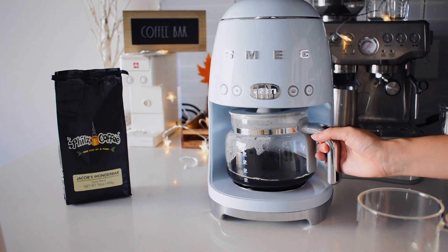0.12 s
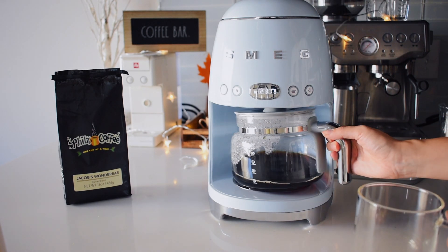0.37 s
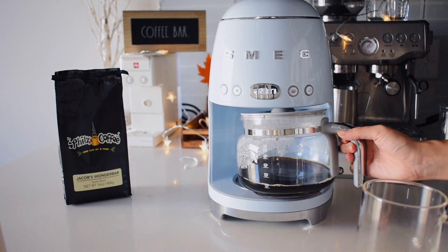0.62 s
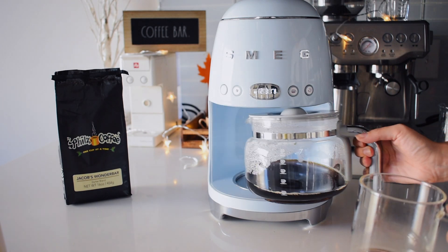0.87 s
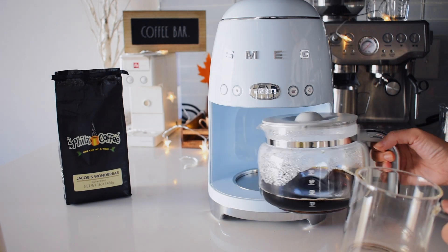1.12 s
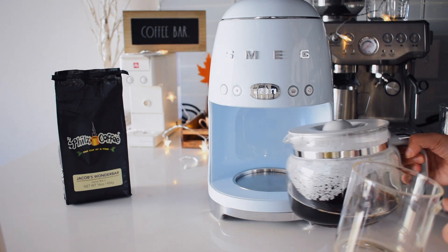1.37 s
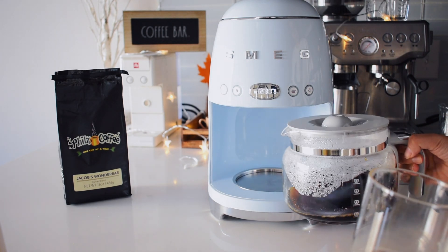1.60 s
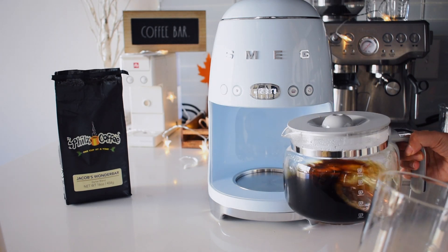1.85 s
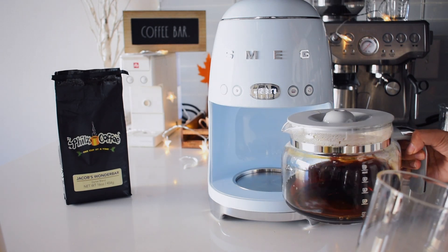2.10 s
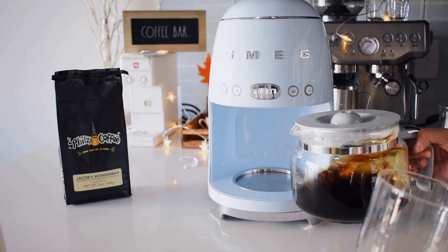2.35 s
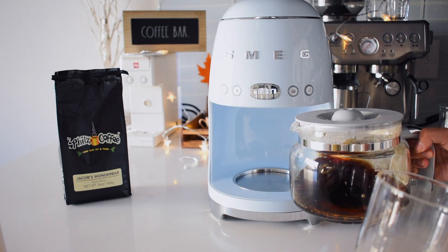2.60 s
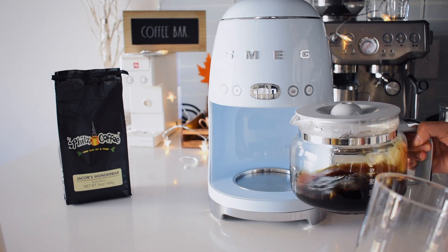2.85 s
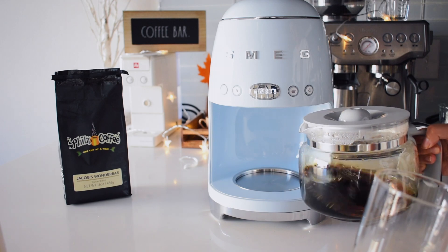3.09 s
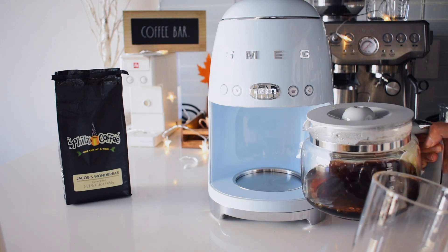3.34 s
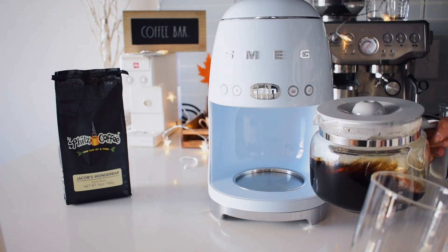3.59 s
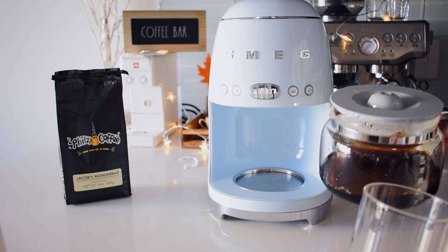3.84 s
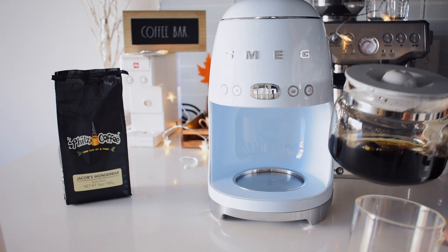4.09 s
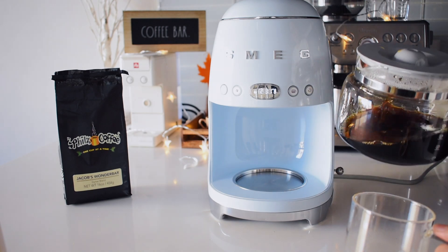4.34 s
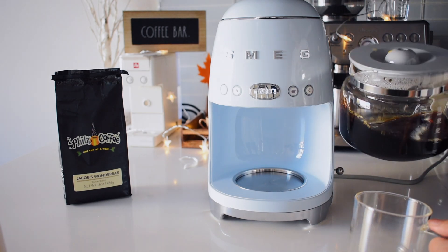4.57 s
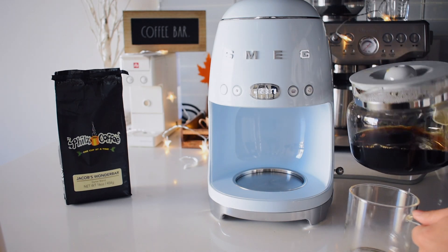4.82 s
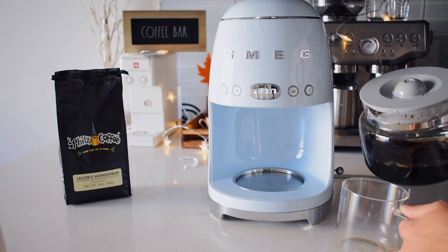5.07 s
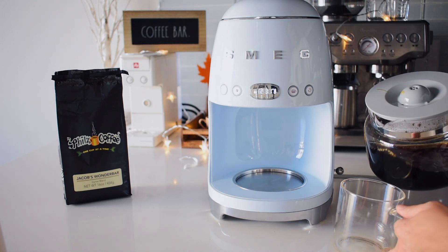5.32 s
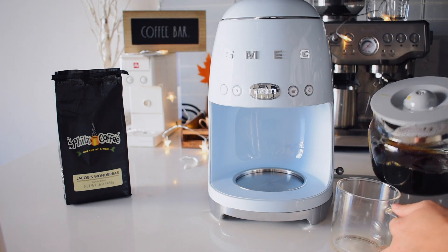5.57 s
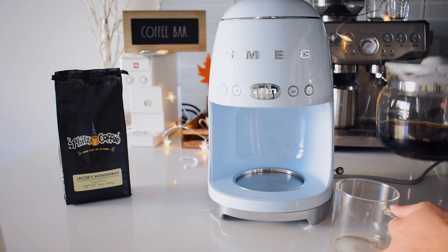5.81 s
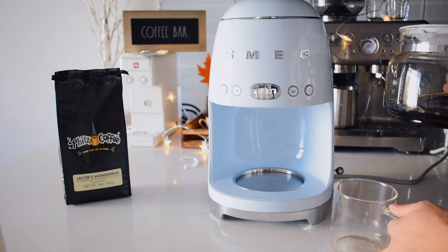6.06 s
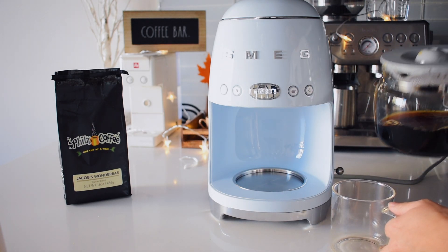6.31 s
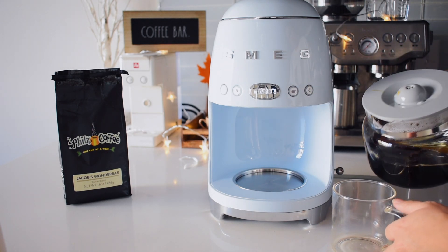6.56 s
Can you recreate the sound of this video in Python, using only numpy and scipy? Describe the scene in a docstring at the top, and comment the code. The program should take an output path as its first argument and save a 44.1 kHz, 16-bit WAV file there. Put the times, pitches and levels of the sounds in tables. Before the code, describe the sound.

Short gritty slide and clatter of a glass pot, faint lid ticks, a long near-silence, then bright glass clinks and a mug knock.

```python
"""A glass carafe slides out of a coffee maker and is swirled, its plastic lid and handle ticking;
its rim clinks a glass mug, which knocks and shuffles on a stone counter.
Glass and plate are struck banks of decaying modes, ticks and knocks are filtered crackles, rubbing is
filtered grains; filtered noise makes the hum of the quiet hard kitchen, which answers with a flutter
echo and a short tail."""
import sys
import numpy as np
from scipy import signal
from scipy.fft import rfft, irfft, next_fast_len
from scipy.io import wavfile
from scipy.ndimage import uniform_filter1d, map_coordinates

SR = 44100
rng = np.random.default_rng(int(sys.argv[2]) if len(sys.argv) > 2 else 0)


def inscribe(sig):
    """Save sig as 16-bit PCM at rate SR to the path in sys.argv[1].

    A 1-D sig is mono; a 2-D sig holds one channel per row.
    Samples are clipped to [-1, 1] before scaling.
    """
    pcm = np.round(np.clip(np.atleast_2d(sig).T, -1, 1) * 32767)
    wavfile.write(sys.argv[1], SR, pcm.astype(np.int16))


def gain_from_db(level_db):
    """Turn a decibel level (scalar or array-like) into a linear amplitude factor."""
    decades = np.asarray(level_db, float) / 20
    return 10 ** decades


N = 294588  # length in samples


def unit(x):
    """Scale to rms 1."""
    return x / np.sqrt(np.mean(x ** 2) + 1e-20)


def along(points, hz):
    """Read a curve of (Hz, value) points on a log frequency axis."""
    f, v = np.transpose(points)
    return np.interp(np.log(hz + 1), np.log(f + 1), v)


def gains(rows):
    """One gain per sample for each dB column, silent outside the table."""
    s, *columns = np.transpose(rows)
    t = np.arange(N) / SR
    return [gain_from_db(np.interp(t, s, db, left=-120, right=-120)) for db in columns]


def stroke(s, db, rise, fall):
    """A gain that swells to db at s and fades, straight in dB; rise and fall are seconds per 20 dB."""
    t = np.arange(N) / SR - s
    return gain_from_db(db - 20 * np.maximum(-t / rise, t / fall))


def filtered(x, response):
    """Shape the spectrum of x by a complex response of frequency."""
    m = next_fast_len(len(x) + 8192)
    spectrum = rfft(x, m) * response(np.fft.rfftfreq(m, 1 / SR))
    return irfft(spectrum, m)[:len(x)]


def bell(hz, centre_hz, octaves):
    """A bell-shaped weight on a log frequency axis."""
    distance = np.log2((hz + 1) / centre_hz) / octaves
    return np.exp(-.5 * distance ** 2)


def resonances(peaks):
    """Causal response of (Hz, width Hz, dB) resonances, summed with alternating signs."""
    def response(f):
        total = 0
        for k, (centre, width, db) in enumerate(peaks):
            damping = 1j * f * width
            total = total + (-1) ** k * gain_from_db(db) * damping / (centre * centre - f * f + damping)
        return total
    return response


def grit(rate, spread_db):
    """Sparse grains of uneven size, on average rate a second."""
    hits = rng.random(N) < rate / SR
    return hits * rng.standard_normal(N) * gain_from_db(spread_db * rng.standard_normal(N))


def add(mix, s, sound, near_db=0):
    """Put a sound and its room answer into the mix at s seconds."""
    part = mix[round(s * SR):]
    wet = kitchen(sound, near_db)[:len(part)]
    part[:len(wet)] += wet


def struck(blows, pitches, modes, rise, blur_hz=0, near_db=0):
    """Each blow wakes the modes near its own pitch most; loose contact blurs their pitch."""
    mix, t = np.zeros(N), np.arange(SR // 2) / SR
    hz = np.array(pitches)[:, None]
    level, t60 = np.transpose(modes)[:, :, None]
    for s, db, centre_hz, octaves in blows:
        luck = rng.standard_normal((2, len(modes), 1))  # uneven level and random sign per mode
        size = gain_from_db(db + level + luck[0]) * np.sign(luck[1]) * bell(hz, centre_hz, octaves)
        # a random walk of phase in steps of 50 samples, smoothed
        walk = rng.standard_normal((len(modes), len(t) // 50)).cumsum(1).repeat(50, 1)
        wander = np.sqrt(2 * np.pi * blur_hz / SR) * walk * 50 ** .5
        phase = 2 * np.pi * hz * t + uniform_filter1d(wander, size=50)
        ring = size * gain_from_db(-60 * t / t60) * np.sin(phase)
        add(mix, s, ring.sum(0) * (1 - np.exp(-t / rise)), near_db)
    return mix


def bursts(rows, rise):
    """Contacts without a clear ring, rows of (s, dB, Hz, octaves, decay s): a dying crackle round one pitch."""
    mix, t, lead = np.zeros(N), np.arange(SR // 8) / SR, SR // 100
    for s, db, hz, octaves, decay_s in rows:
        shape = (1 - np.exp(-t / rise)) * gain_from_db(-60 * (t / decay_s) ** 1.5)
        z = rfft(shape * rng.standard_normal(len(t)))
        crackle = np.sqrt(shape) * irfft(z / np.abs(z), len(t))  # flattened: no chance peaks to ring on
        # the lead leaves room for the filter's spread ahead of the contact
        puff = filtered(np.pad(crackle, (lead, 0)), lambda f: bell(f, hz, octaves))
        add(mix, s - lead / SR, gain_from_db(db) * puff * np.linalg.norm(shape) / np.linalg.norm(puff))
    return mix


def carafe():
    """The glass body rings on through its modes; the banded rim clinks, mostly with quick decays."""
    # blows on the body: start_s, level_db (ahead of mode levels), push_centre_hz, push_width_octaves
    body_blows = [(1.59, -45.5, 3280, .68), (1.99, -48, 2560, 0.17), (2.06, -44, 1900, 0.56),
                  (2.099, -34.5, 1760, .26), (2.303, -48, 8400, .15), (2.311, -39, 4500, 0.11),
                  (2.335, -36.5, 1650, .12), (2.489, -50.5, 2600, .11), (2.51, -46.5, 2580, .1),
                  (2.868, -48.5, 2840, 0.29), (3.416, -50.5, 3100, 0.68), (3.847, -41, 3800, 0.8),
                  (4.841, -45, 3200, .68)]
    # body mode pitches: pitch_hz
    body_hz = [1655, 2112, 2580, 2832, 3505, 3700, 4400, 4565, 4829, 8430]
    # body mode strengths: level_db, t60_s
    body_modes = [(-5.5, 0.15), (-4, 0.082), (-3.5, 0.1), (-9, 0.098), (-1, 0.09), (-6.5, 0.1), (-16, 0.12),
                  (-8, 0.13), (-13, 0.25), (-5, 0.25)]
    # blows on the rim: start_s, level_db (ahead of mode levels), push_centre_hz, push_width_octaves
    rim_blows = [(5.531, -23, 5500, 2.7), (5.606, -31.5, 5500, 1.7)]
    # rim mode pitches: pitch_hz
    rim_hz = [3400, 3607, 3989, 4323, 4468, 4840, 5115, 5254, 5631, 5771, 6406, 7155, 7241, 7311, 8059,
              8775, 9076, 10110, 13150, 13650]
    # rim mode strengths: level_db, t60_s
    rim_modes = [(-0.5, 0.038), (6.5, 0.045), (5.5, 0.022), (2.5, 0.042), (4, 0.02), (0, 0.06), (1, 0.055),
                 (-19, .08), (0, 0.045), (-25, 0.65), (-22, .1), (11, 0.03), (-19, 0.038), (-29, .2),
                 (-6, 0.037), (-10.5, 0.21), (0.5, 0.046), (-8, 0.072), (-18, .06), (-20, .08)]
    body = struck(body_blows, body_hz, body_modes, rise=.001, blur_hz=14)
    return body + struck(rim_blows, rim_hz, rim_modes, rise=.001, blur_hz=4)


def slide():
    """The carafe base drags over the hot plate: slips shake plate and glass base, finer grit hisses."""
    # drag levels over time: time_s, grind_db, hiss_db
    drag_levels = [(0.0, -58, -59), (0.05, -53, -63), (0.085, -46.5, -63), (0.124, -62.5, -64),
                   (0.2, -60, -72), (0.216, -44.5, -63), (0.26, -43.5, -68), (0.378, -41, -66),
                   (0.415, -36.5, -59)]
    # resonances of plate and housing: centre_hz, width_hz, level_db
    plate_peaks = [(188, 110, 5.5), (294, 105, 12), (481, 57, 10), (610, 120, 10.5), (1190, 81, -18)]
    grind, hiss = gains(drag_levels)
    plate = unit(filtered(grit(350, spread_db=1.5), resonances(plate_peaks)))
    base = unit(filtered(grit(250, spread_db=4), lambda f: bell(f, 1600, .45)))
    fine = unit(filtered(grit(3800, spread_db=4.5), lambda f: bell(f, 6400, 0.61)))
    base_db = -8  # glass base against the plate
    return kitchen(grind * (plate + gain_from_db(base_db) * base) + hiss * fine)[:N]


def hot_plate():
    """Blows on the steel plate wake its modes, strongly blurred in pitch."""
    # blows: start_s, level_db (ahead of mode levels), push_centre_hz, push_width_octaves
    plate_blows = [(.076, -32.5, 2530, 0.16), (.215, -30.5, 1780, 0.38), (.418, -29, 3550, 4),
                   (.438, -23.5, 1490, 0.95), (.565, -30, 4530, 0.87), (.854, -45, 3000, 0.69),
                   (.951, -50, 3000, 1.6), (1.024, -32.5, 2980, 1.2)]
    # mode pitches: pitch_hz
    steel_hz = [590, 1045, 1250, 1590, 1776, 2500, 3950, 4650, 5000, 6250, 8100]
    # mode strengths: level_db, t60_s
    steel_modes = [(9, 0.079), (-6.5, 0.15), (0.5, 0.053), (-6, 0.16), (-5.5, 0.14), (-6.5, 0.026),
                   (-9, 0.13), (-9.5, 0.086), (-7, 0.11), (-6, 0.1), (-31, 0.066)]
    return struck(plate_blows, steel_hz, steel_modes, rise=.001, blur_hz=110)


def ticks():
    """Short crackles: clear ticks, and a faint rattle of the loose lid at chance moments of the swirl."""
    # ticks of lid, handle and drip valve, and the crack of each clink:
    # start_s, level_db, centre_hz, width_octaves
    tick_rows = [(0.1644, -52, 8800, .3), (0.177, -52, 7100, .25), (0.213, -52, 7050, .4),
                 (0.2578, -52, 7140, .36), (0.343, -33, 5600, .5), (0.4171, -25, 5150, 0.56),
                 (0.425, -39, 4850, 0.35), (0.4373, -25, 6000, 1), (0.5657, -29.5, 5000, 0.58),
                 (0.853, -44.5, 6620, 0.3), (0.949, -44.5, 6000, .52), (0.9894, -52, 4500, 0.61),
                 (1.0245, -27.5, 7100, 0.39), (1.046, -37, 6740, 0.31), (1.071, -41, 3700, 0.62),
                 (1.591, -32.5, 4280, 0.74), (1.8118, -56, 8690, .34), (2.0376, -46.5, 3540, 0.76),
                 (2.272, -49, 5700, .49), (2.3028, -43, 8300, 0.35), (2.3112, -36.5, 5000, 0.28),
                 (2.4897, -53, 3500, .45), (2.509, -55, 6150, 0.55), (2.5925, -50, 7660, 0.67),
                 (2.692, -56, 5240, .37), (2.703, -44, 5070, .24), (2.8672, -43, 3750, .6),
                 (3.165, -52, 6810, 1), (3.1953, -46, 6000, 0.18), (3.4154, -44.5, 7150, .98),
                 (3.8467, -38.5, 3860, .95), (3.8556, -35.5, 6800, 0.49), (4.8413, -43, 3800, 0.53),
                 (5.5299, -21, 7000, 0.62), (5.607, -29.5, 5230, .92), (5.6964, -38, 4020, 0.31),
                 (5.696, -34, 7800, 0.17), (6.218, -55, 5000, .4), (6.305, -34, 3300, .38),
                 (6.306, -42, 7700, 0.089)]
    first_s, last_s, count = 1.9, 3.2, 8
    rattle = []
    for when, size, pitch in rng.random((count, 3)):
        s = first_s + (last_s - first_s) * when
        rattle.append((s, -54 + 6 * (size - .5), 5500 * 2 ** (pitch - .5), .45))
    decay_s = 0.019
    return bursts([(*row, decay_s) for row in tick_rows + rattle], rise=0.00091)


def knocks():
    """Dull crackles: rumbling bumps of the drag and knocks, with slower low booms under some of them."""
    # rumbling bumps of the dragged carafe, then knocks on the machine's housing and the counter:
    # start_s, level_db, centre_hz, decay_s
    knock_rows = [(0.212, -43, 1630, 0.052), (0.258, -35, 297, 0.025), (0.298, -40, 795, 0.01),
                  (0.319, -37.5, 356, 0.04), (0.3419, -40.5, 2120, 0.025), (0.364, -35, 507, 0.011),
                  (0.417, -43, 540, 0.052), (0.437, -34, 577, .054), (0.439, -30.5, 1830, 0.027),
                  (0.564, -37, 690, 0.043), (0.822, -43, 347, 0.023), (0.853, -46.5, 1240, 0.036),
                  (0.95, -48, 1170, 0.032), (1.0237, -35.5, 2820, 0.042), (1.025, -33, 720, 0.079),
                  (1.046, -38, 623, 0.031), (5.531, -27.5, 750, 0.028), (5.605, -35, 790, 0.021),
                  (5.6945, -13, 2460, 0.0076), (6.294, -45, 910, .018), (6.308, -34.5, 950, 0.091)]
    # booms of the machine's hollow body and the counter: start_s, level_db, centre_hz
    boom_rows = [(0.073, -55, 298), (0.212, -43, 203), (0.436, -34, 305), (1.024, -38, 205),
                 (5.696, -41, 237)]
    knock_octaves = 0.6
    boom_octaves, boom_decay_s = 0.61, 0.13
    dull = [(s, db, hz, knock_octaves, decay_s) for s, db, hz, decay_s in knock_rows]
    low = [(*row, boom_octaves, boom_decay_s) for row in boom_rows]
    return bursts(dull, rise=0.00042) + bursts(low, rise=0.014)


def mug():
    """The glass wall rings bright and long; the foot answers lower, shorter and more blurred."""
    # blows on the wall: start_s, level_db (ahead of mode levels), push_centre_hz, push_width_octaves
    wall_blows = [(5.531, -15.5, 1900, 0.48), (5.606, -33, 2580, 0.38), (5.695, -19, 2480, 12),
                  (6.307, -32.5, 2550, .55), (6.309, -30, 10000, 0.34)]
    # wall mode pitches: pitch_hz
    wall_hz = [1152, 2627, 2659, 2700, 4640, 7499, 8877, 10750, 12610]
    # wall mode strengths: level_db, t60_s
    wall_modes = [(1, .31), (-11, .3), (-11, .36), (-14, .12), (-12, .44), (-21, .15), (-29, .2),
                  (-30, .22), (-28, .18)]
    # blows on the foot: start_s, level_db (ahead of mode levels), push_centre_hz, push_width_octaves
    foot_blows = [(5.531, -22.5, 694, 1), (5.606, -35, 800, 1.1), (5.695, -14, 1100, 1.74),
                  (6.307, -22, 910, 0.76)]
    # foot mode pitches: pitch_hz
    foot_hz = [690, 775, 820, 860, 910, 965, 1350, 1500, 1750, 1930, 2230, 2320, 3450, 3830]
    # foot mode strengths: level_db, t60_s
    foot_modes = [(-7.5, 0.043), (5, 0.027), (2.5, 0.022), (-10, 0.11), (-12, 0.14), (-41, 0.14),
                  (0.5, 0.023), (-11, 0.063), (11.5, 0.01), (-2, 0.017), (3.5, 0.022), (0, 0.029),
                  (-14, 0.017), (-3.5, 0.042)]
    wall = struck(wall_blows, wall_hz, wall_modes, rise=.0006, blur_hz=2, near_db=4)
    return wall + struck(foot_blows, foot_hz, foot_modes, rise=.0015, blur_hz=15)


def shuffle():
    """The mug rubs on the counter: grains wake its foot and, a little later, one high wall mode."""
    # one row a stroke: peak_s, rub_db, singing_db
    rub_strokes = [(6.145, -52, -64), (6.56, -57, -80), (6.635, -59, -68)]
    rise_s, fall_s, sing_lag_s = .06, 0.028, 0.017  # rise and fall per 20 dB
    rub = sum(stroke(s, db, rise_s, fall_s) for s, db, _ in rub_strokes)
    sing = sum(stroke(s + sing_lag_s, db, rise_s, fall_s) for s, _, db in rub_strokes)
    foot = unit(filtered(grit(1500, spread_db=2), lambda f: bell(f, 800, .25)))
    wall = unit(filtered(grit(1500, spread_db=2), lambda f: bell(f, 7500, .015)))
    return rub * foot + sing * wall


def swish():
    """A short fizz of fine grains that swells quickly and fades slower."""
    # one row a swell: peak_s, level_db
    fizz_swells = [(1.972, -62), (2.046, -57)]
    rise_s, fall_s = 0.011, 0.15  # per 20 dB
    fizz = unit(filtered(grit(4000, spread_db=1), lambda f: bell(f, 6000, .7)))
    gain = sum(stroke(s, db, rise_s, fall_s) for s, db in fizz_swells)
    return kitchen(gain * fizz)[:N]


def air():
    """Room tone of filtered noise; its humming bands waver, the rest wavers less."""
    # spectrum of the room tone: pitch_hz, relative level_db per Hz
    tone_curve = [(25, -25), (80, -19), (120, -25.5), (165, -23), (210, -9), (400, -0.5), (860, -2.5),
                  (1300, -4.5), (1700, -9.5), (3500, -14), (6800, -19.5), (7400, -22.5), (11000, -26),
                  (15900, -33)]
    # humming bands of the room: centre_hz, width_hz, level_db
    hum_bands = [(120, 14, -12), (207, 16, 0), (308, 18, -1), (465, 18, -3), (620, 20, -5), (772, 16, -4),
                 (905, 22, -7)]
    waver_db = map_coordinates(rng.standard_normal(80), [np.arange(N) * 9 / SR])  # 9 random points a second
    tone = unit(filtered(rng.standard_normal(N), lambda f: gain_from_db(along(tone_curve, f))))
    hum = unit(filtered(rng.standard_normal(N), resonances(hum_bands)))
    air_db, hum_db = -57.5, -5.5  # the hum is set against the tone
    return gain_from_db(air_db) * (gain_from_db(.4 * waver_db) * tone + gain_from_db(hum_db + waver_db) * hum)


def kitchen(x, near_db=0):
    """Direct sound, flutter echo and a fresh diffuse tail that dies band by band; near_db lowers the answer."""
    # decay of the tail: pitch_hz, t60_s
    tail_decay = [(200, 0.51), (800, 0.48), (2500, 0.55), (6000, 0.46), (12000, 0.27)]
    # one round trip between two hard walls: trip_s, lost_db
    wall_trip = (0.019, -16.5)
    trip_s, lost_db = wall_trip
    hz, t, z = signal.stft(rng.standard_normal(SR // 2), SR, nperseg=256)
    fade = gain_from_db(-60 * t / along(tail_decay, hz)[:, None])
    tail = signal.istft(z * fade, SR, nperseg=256)[1]
    tail *= 1 - np.exp(-np.arange(len(tail)) / SR / 0.0032)  # soft onset
    tail_db = -6.5
    answer = gain_from_db(tail_db) * tail / np.linalg.norm(tail)
    for trip in (1, 2, 3):
        answer[round(trip * trip_s * SR)] += gain_from_db(trip * lost_db)
    answer *= gain_from_db(-near_db)
    answer[0] = 1  # direct sound
    return signal.fftconvolve(x, answer)


def scene():
    """All sources share one microphone colour; the mug's wall ring is drier, its shuffle has no room
    answer; room tone is added after."""
    # colour of the microphone: pitch_hz, level_db
    mic_curve = [(40, -16), (110, -12.5), (200, -2.5), (8000, -1), (11000, -10.5), (16000, -22)]
    sources = carafe() + slide() + hot_plate() + ticks() + knocks() + mug() + shuffle() + swish()
    coloured = filtered(sources, lambda f: gain_from_db(along(mic_curve, f)))
    return (coloured + air())[None]


def top_cut(x):
    """Nothing passes above the cut-off."""
    return signal.sosfilt(signal.butter(12, 16030, fs=SR, output="sos"), x)


def record(dry):
    """Deliver the finished mix."""
    return top_cut(dry)


dry = scene()
out = record(dry)
inscribe(out)
```